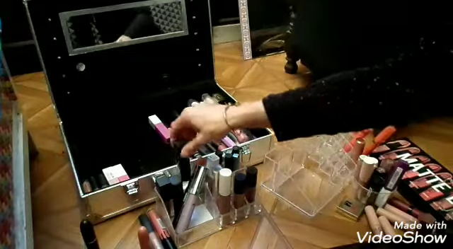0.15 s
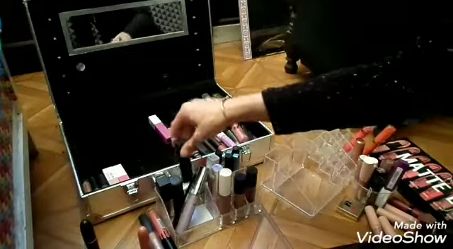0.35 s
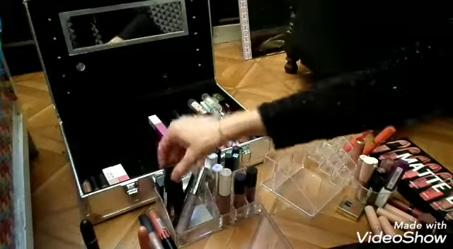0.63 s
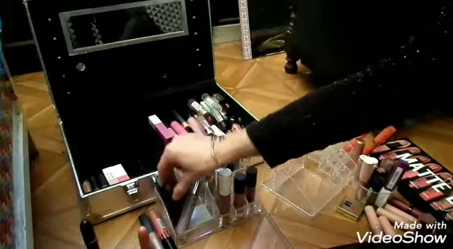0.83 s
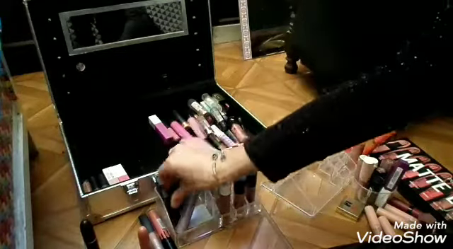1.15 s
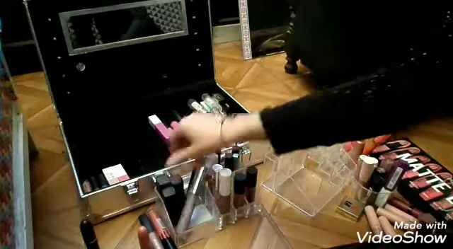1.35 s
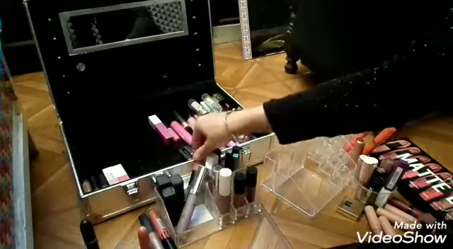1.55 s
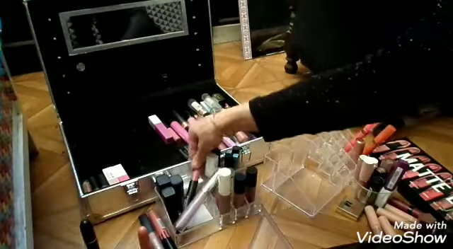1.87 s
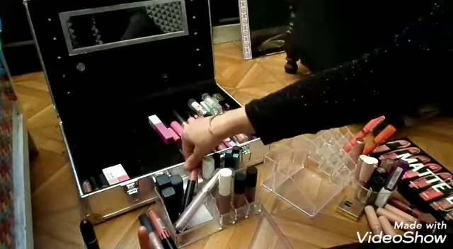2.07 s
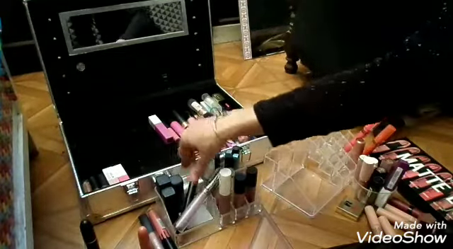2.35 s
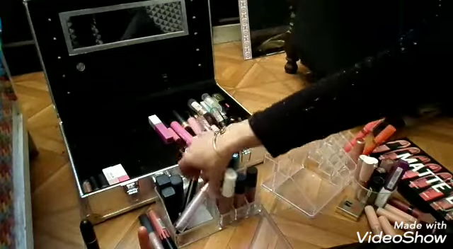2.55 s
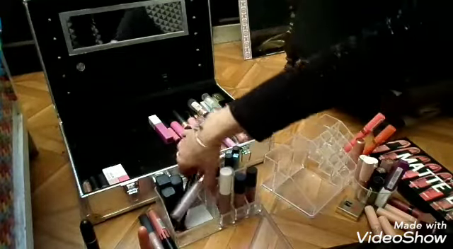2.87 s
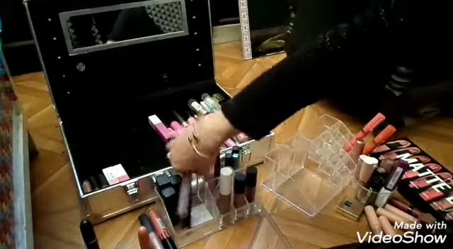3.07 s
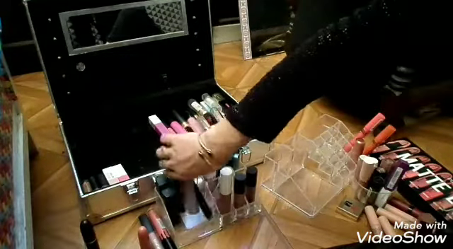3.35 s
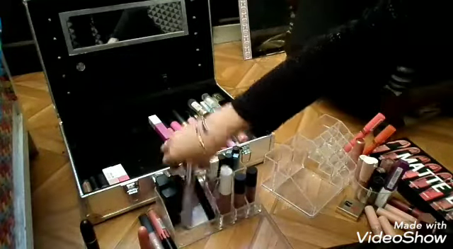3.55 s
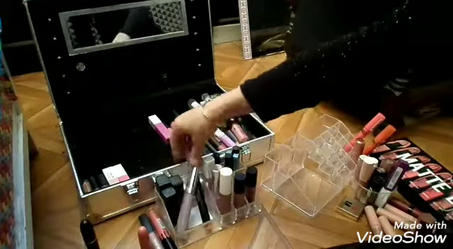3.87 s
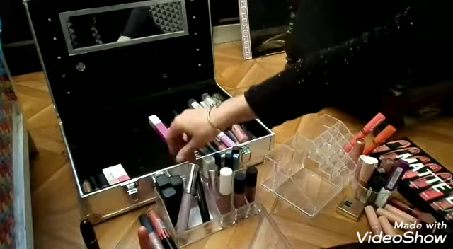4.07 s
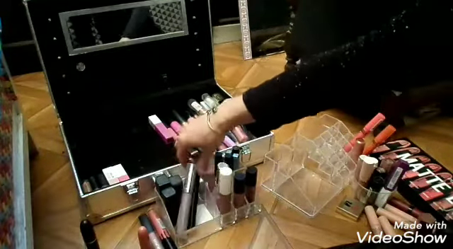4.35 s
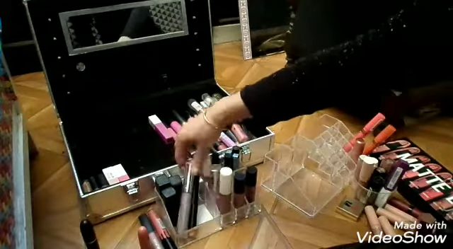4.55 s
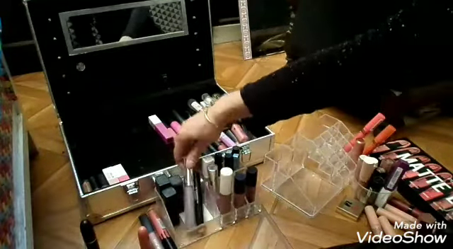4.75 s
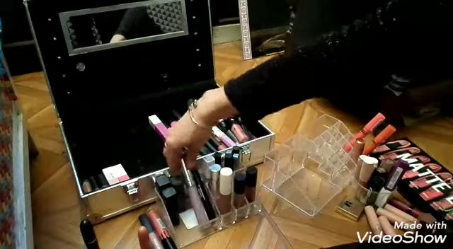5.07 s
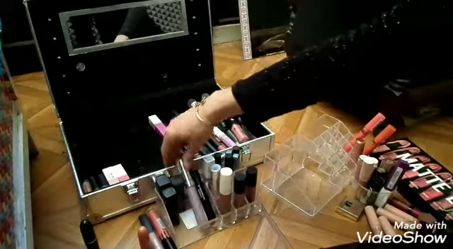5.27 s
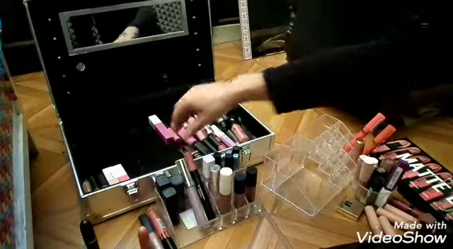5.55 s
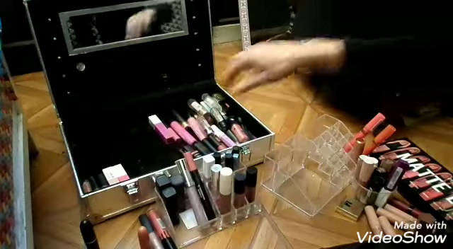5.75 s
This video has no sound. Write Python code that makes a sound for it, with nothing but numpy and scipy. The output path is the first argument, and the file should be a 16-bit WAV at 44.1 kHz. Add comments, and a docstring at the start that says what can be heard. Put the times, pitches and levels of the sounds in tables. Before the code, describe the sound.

Light hard-shelled tubes tap, rattle and briefly rub together in a clear plastic tray, recorded close in a small room. Sparse clacks at first, stronger ones near 0.65, 0.95 and 1.7 seconds, a busier rattle towards three, then a far louder crack with a short floor thump at 3.5. Moderate clicks continue to about 5.3 seconds, then fade into dull wobbling over soft hiss.

```python
"""Sorting lipsticks in an acrylic organiser

A hand sorts lipstick tubes and gloss bottles in an organiser on a wooden floor, close to the microphone.
Each contact is a hollow knock of damped modes with a hard plastic click and tick on top; scrapes are stick-slip noise.
Some knocks repeat quickly, some rock; one tube drops in hard and shakes the floor, and the last one rocks near the end.
The organiser rings, a small room echoes, a low rumble swells late, hiss runs throughout; gain control ducks loud hits."""
import sys
import numpy as np
from scipy import signal
from scipy.fft import rfft, irfft
from scipy.io import wavfile
from scipy.ndimage import uniform_filter1d

SR = 44100
rng = np.random.default_rng(int(sys.argv[2]) if len(sys.argv) > 2 else 0)


def digitize_waveform(pressure):
    """Quantize a signal to 16-bit integers and store it at the path in sys.argv[1].

    Rows of a 2-D input are taken as channels; values are limited to [-1, 1].
    """
    field = np.atleast_2d(pressure).T
    bounded = np.clip(field, -1, 1)
    quanta = np.round(bounded * 32767).astype(np.int16)
    wavfile.write(sys.argv[1], SR, quanta)


N = 260410
T = np.arange(SR // 4) / SR  # time axis of one decay, s

# How readily tubes and organiser radiate. Each row: frequency [Hz], relative level [dB].
RADIATION = [(150, -31), (330, -3.5), (540, -2), (780, 2.5), (1150, -4.5), (1600, 2), (2050, -4.5),
             (2600, -2.5), (3900, 0), (5600, -5), (9500, -10.5), (15500, -12.5)]


def gain_of(db):
    """Decibels to amplitude."""
    return 10 ** (np.asarray(db) / 20)


def read(points, hz):
    """Interpolates a table linearly on a log-frequency axis."""
    f, value = np.transpose(points)
    return np.interp(np.log(hz + 1), np.log(f + 1), value)


def evened(x):
    """Scales to rms 1."""
    return x / np.sqrt(np.mean(x ** 2) + 1e-20)


def one_hit(x):
    """Scales to the energy of 7 ms at rms 1."""
    return x / np.sqrt(np.sum(x ** 2) / (.007 * SR) + 1e-20)


def add(mix, s, sound):
    """Mixes a sound in at time s."""
    part = mix[max(round(s * SR), 0):][:len(sound)]
    part += sound[:len(part)]


def coloured(x, db_at):
    """Filters x by a gain in dB given as a function of frequency."""
    hz = np.fft.rfftfreq(len(x), 1 / SR)
    return irfft(rfft(x) * gain_of(db_at(hz)), len(x))


def hiss(level_db=-59.5):
    """Still air and microphone hiss: steady coloured noise."""
    # Each row: frequency [Hz], relative density [dB].
    hiss_colour = [(20, -1), (110, -5.5), (350, -10), (750, -9.5), (1700, -17.5), (4000, -20.5),
                   (11000, -23.5), (16000, -29)]
    noise = coloured(rng.standard_normal(N), lambda hz: read(hiss_colour, hz))
    return gain_of(level_db) * evened(noise)


def friction(strokes, slips_per_s, smooth_share, slope_db_per_octave):
    """Stick and slip: each stroke is a run of tiny clicks into the plastic over a smooth rub."""
    def rub_db(hz):
        tilt_db = slope_db_per_octave * np.log2(np.maximum(hz / 1000, 1))
        low_cut_db = -20 * np.log10(1 + (350 / (hz + 1)) ** 2)
        return read(RADIATION, hz) + tilt_db + low_cut_db

    slips = rng.uniform(-1.1, 1, N) * ((rng.random(N) < slips_per_s / SR) + smooth_share)
    grain = rng.standard_normal(len(T)) * gain_of(-60 * T / 0.011)  # t60 11 ms
    run = coloured(signal.fftconvolve(slips, grain)[:N], rub_db)
    out = np.zeros(N)
    for start, end, db in strokes:
        length = max(round((end - start) * SR), 64)
        part = run[max(round(start * SR), 0):][:length]
        add(out, start, gain_of(db) * evened(part * signal.windows.tukey(len(part), .5)))
    return out


def scrapes():
    """Tubes scrape along each other in dense slips."""
    # Each row: start [s], end [s], level [dB].
    scrape_strokes = [(0, .04, -37), (.734, .752, -34), (1.787, 1.824, -27.5), (2.428, 2.503, -36),
                      (2.616, 2.695, -39.5), (3.0, 3.055, -43.5), (3.052, 3.082, -27), (3.587, 3.63, -26.5),
                      (4.29, 4.338, -32.5)]
    return friction(scrape_strokes, slips_per_s=1000, smooth_share=0.055, slope_db_per_octave=-5)


def cluster(lo_hz, hi_hz, centre_hz, octaves, t60_s, rise_s, uneven_db, count):
    """Damped plastic modes round a centre; each point of contact wakes them in another mix."""
    t = T[:SR // 25]
    hz = lo_hz * (hi_hz / lo_hz) ** ((np.arange(count) + rng.random(count)) / count)
    off_centre = np.log2(hz / centre_hz) / octaves
    focus_db = -20 * np.log10(1 + off_centre ** 2)
    db = read(RADIATION, hz) + focus_db + uneven_db * rng.standard_normal(count)
    waves = np.sin(2 * np.pi * (hz[:, None] * t + rng.random((count, 1))))
    envelope = gain_of(-60 * t / t60_s) * (1 - np.exp(-t / rise_s))
    return one_hit(gain_of(db) @ waves * envelope)


def knock(pitch_hz, middle_hz=1100, widest_octaves=0.47, narrowing_octaves=0.6, cycles=25):
    """The hollow body of a tube: a middle pitch wakes the widest band of modes, a low or high one a purer tok."""
    octaves = widest_octaves / (1 + (np.log2(pitch_hz / middle_hz) / narrowing_octaves) ** 2)
    return cluster(251.5, 1927, pitch_hz, octaves, t60_s=cycles / pitch_hz, rise_s=0.0033, uneven_db=1.0, count=15)


def hard_shell(click_db, tick_under_db=9, tick_growth=0.22):
    """The click of the hard shell and the tick of its edge; sharp contacts have the strongest tick."""
    click = cluster(1992, 6000, 3200, octaves=5.6, t60_s=0.023, rise_s=0.0011, uneven_db=4.5, count=26)
    tick = cluster(6000, 16000, 6800, octaves=2.7, t60_s=0.029, rise_s=0.0006, uneven_db=5.0, count=44)
    tick_db = click_db - tick_under_db + tick_growth * click_db  # growth: extra dB per dB of click
    return gain_of(click_db - 2.54) * click + gain_of(tick_db) * tick


def contacts_of(hits, lead_db=-20, lead_s=0.0027, chatter_db=-13, chatter_s=0.0056, chatter_loss_db=5, count=3):
    """The hollow knock with its click and tick and a soft click lead-in, then chatter of the light shell."""
    out = np.zeros(N)
    for s, db, pitch_hz, click_db in hits:
        shell = hard_shell(click_db)
        add(out, s, gain_of(db) * (knock(pitch_hz) + shell))
        add(out, s - lead_s, gain_of(db + lead_db) * shell)
        lags_s = np.cumsum(chatter_s * rng.uniform(0.36, 2.4, count))
        for k, lag_s in enumerate(lags_s):
            add(out, s + lag_s, gain_of(db + chatter_db - k * chatter_loss_db) * shell)
    return out


def organiser(x, ring_db=-55, t60_s=0.14):
    """The acrylic walls ring on after every blow: a sum of modes with one common decay."""
    # Each row: ring mode [Hz], relative level [dB].
    wall_modes = [(802, -7), (936, -17.5), (1049, 0), (1379, -1.5), (1658, -1), (1984, 14.5), (2548, 2),
                  (2973, -5.5), (3303, -18.5), (4144, -10), (6330, 3), (7170, -2)]
    ring = sum(gain_of(db) * np.cos(2 * np.pi * hz * T) for hz, db in wall_modes)
    ring = ring * gain_of(-60 * T / t60_s)
    return gain_of(ring_db) * signal.fftconvolve(x, ring)[:N]


def room(x, gap_s=0.0065, build_s=0.0029, count=6, patterns_per_s=10):
    """Echoes from case lid and furniture; patterns crossfade in a cycle as the hand and tubes move about."""
    # Each row: frequency [Hz], t60 [s], level [dB].
    echo_table = np.array([(200, 0.16, -8), (800, .13, -10), (1980, 0.13, -8), (5000, 0.16, -12),
                           (13180, 0.16, -7.5)])
    out = np.zeros(N)
    place = np.arange(N) / SR * patterns_per_s
    for k in range(count):
        echoes = rng.standard_normal(len(T)) * np.clip((T - gap_s) / build_s, 0, 1)
        hz, age_s, z = signal.stft(echoes, SR, nperseg=128)
        z = z * gain_of(-60 * age_s / read(echo_table[:, :2], hz)[:, None])
        levelled = z * gain_of(read(echo_table[:, ::2], hz))[:, None]
        tail = signal.istft(levelled, SR)[1] / np.linalg.norm(signal.istft(z, SR)[1])
        share = np.sqrt(np.maximum(1 - abs((place - k + 1) % count - 1), 0))
        out += signal.oaconvolve(x * share, tail)[:N]
    return out


def rocking(pitch_hz=950, swing_shrink=.924, swing_loss_db=1.5, limp_db=24.5):
    """A tube tips against each side of its slot in turn: quickening, fading dull knocks, uneven if it limps."""
    # Each row: start [s], end [s], first swing before limp [s], level before limp [dB], limp [0-1].
    rocks = [(.158, .58, .111, -39.5, 0), (2.725, 2.97, .111, -40.5, 0), (5.181, 5.87, .097, -48, .07)]
    out = np.zeros(N)
    for s, end, swing_s, db, limp in rocks:
        for k in range(10):
            lean = limp * (-1) ** k  # positive: longer swing, softer landing
            tap = gain_of(db - k * swing_loss_db - lean * limp_db) * knock(pitch_hz)
            add(out, s, tap * (s < end))
            s += swing_s * swing_shrink ** k * (1 + lean)
    return out


def bounces(rebound=.66, dulling_db=5):
    """Quick repeats: each gap is a fixed share of the last, each hit clicks less over its knock."""
    # Knocks with quick repeats, and the later bounces of the hard drop. Each row: first hit [s],
    # knock level [dB], knock pitch [Hz], nominal click over knock [dB], first gap [s],
    # loss per repeat [dB], repeats [count].
    repeated_knocks = [(0.3493, -24.5, 1030, -6, 0.024, 28, 1), (0.4131, -27, 1285, -6, 0.021, 0, 1),
                       (.6494, -15.5, 1214, -4, 0.049, 10.5, 2), (0.762, -25.5, 1080, 2, 0.024, 5, 1),
                       (1.176, -34, 1180, 0.5, 0.026, 4.5, 1), (1.6938, -18.5, 1540, -9, 0.036, 16.5, 1),
                       (1.8208, -17.5, 1030, -10, .0415, 7.5, 3),
                       (2.5247, -37.5, 1200, -6.5, 0.015, 0.5, 1),
                       (2.6398, -29.5, 1030, 2.5, 0.034, -3.5, 1), (3.524, -12, 1275, -1.5, .0367, 5.5, 3),
                       (3.7988, -23, 1460, -11, 0.052, 10.5, 1), (4.0071, -37.5, 1260, 1, .0183, -2.5, 1),
                       (4.3687, -25, 1280, -3, .016, -2.5, 1), (4.4069, -23.5, 1250, 2, 0.036, 10, 1),
                       (4.5956, -23.5, 1290, -8, .046, 12, 1), (4.7832, -22, 1190, -12, 0.024, 9.5, 1),
                       (5.27, -18.5, 1190, -3.5, 0.016, 10, 1)]
    hits = []
    for s, db, pitch_hz, click_db, gap_s, loss_db, count in repeated_knocks:
        for k in range(round(count) + 1):
            hits.append((s, db - k * loss_db, pitch_hz, click_db - k * dulling_db))
            s += gap_s * rebound ** k
    return hits


def jostles():
    """Fingers jostle the tubes lightly: sparse slips."""
    # Each row: start [s], end [s], level [dB].
    jostle_strokes = [(.39, .42, -46.5), (.83, .925, -52.5), (1.545, 1.62, -43.5), (2.5, 2.92, -49.5),
                      (2.99, 3.46, -57), (3.79, 3.87, -42.5), (3.975, 4.03, -49), (4.6, 5.06, -51)]
    return friction(jostle_strokes, slips_per_s=130, smooth_share=0.044, slope_db_per_octave=-3.5)


def thud(drop_s=3.466):
    """The floorboards give a short low push under the dropped tube: decaying sines."""
    # Each row: floor mode [Hz], level [dB], t60 [s].
    floor_modes = [(85, -31.5, 0.054), (300, -24.5, 0.013), (561.6, -19, 0.024)]
    out = np.zeros(N)
    push = sum(gain_of(db - 60 * T / t60_s) * np.sin(2 * np.pi * hz * T) for hz, db, t60_s in floor_modes)
    add(out, drop_s, push)
    return out


def rumble(centre_hz=90, width_hz=35):
    """A swell of noise in the lowest resonance of the boards while the hand leans among the tubes."""
    # One row: start [s], end [s], level at the top of the swell [dB].
    start, end, db = (4.62, 5.04, -59.5)
    low = coloured(rng.standard_normal(N), lambda hz: -20 * np.log10(1 + ((hz - centre_hz) / width_hz) ** 2))
    swell = np.sin(np.pi * np.clip((np.arange(N) / SR - start) / (end - start), 0, 1))
    return gain_of(db) * evened(low) * swell


def scene():
    """All contacts, the ring they leave, the room, the rumble and the hiss."""
    # Knocks of tubes on each other or the organiser, and the first blow of the hard drop at 3.4654 s.
    # Each row: time [s], knock level [dB], knock pitch [Hz], nominal click over knock [dB].
    knocks = [(.0415, -30, 1040, -2), (.9442, -18, 1080, -3), (1.0423, -41, 1500, -15),
              (1.245, -33.5, 970, -18), (1.561, -38, 1350, -2), (1.6321, -35, 1380, -1),
              (1.6396, -34.5, 960, 4.5), (1.7466, -32, 1070, 5.5), (1.7945, -37, 1280, 14.5),
              (1.9945, -30.5, 1110, 0.5), (2.1448, -39.5, 1170, 0.5), (2.2515, -42, 770, -5),
              (2.4225, -26.5, 1280, 5.5), (2.4447, -18.5, 890, -32), (2.5738, -27.5, 1000, -5),
              (2.614, -27, 1120, 1.5), (2.7405, -37, 1120, -1), (2.7826, -37, 1180, 4),
              (2.7932, -23, 920, -5), (2.896, -36.5, 1240, -4.5), (3.0282, -31.5, 850, -12),
              (3.05, -36, 1140, 12), (3.0582, -33.5, 1000, 9.5), (3.139, -26.5, 1260, -2.5),
              (3.206, -30.5, 950, -1), (3.3209, -25, 930, -10.5), (3.3702, -37, 1300, 6.5),
              (3.379, -28, 1100, -3.5), (3.4573, -28.5, 940, -3), (3.4654, -0.5, 1260, -3.5),
              (3.6237, -27, 1010, -6), (3.7551, -23.5, 1490, -3.5), (4.1684, -32, 1300, -16),
              (4.2871, -29.5, 870, 9.5), (4.3079, -35, 960, 14), (4.3135, -24.5, 1010, 0),
              (4.5721, -30, 1170, -2), (4.663, -35, 1140, 1.5), (4.7129, -32, 1400, -4.5),
              (4.857, -35.5, 1010, 0), (4.946, -26, 1120, -8), (4.9584, -18, 1230, -4.5),
              (5.0356, -36, 1130, -4.5), (5.0838, -26, 1246, -2.5)]
    hits = contacts_of(knocks + bounces())
    contacts = hits + scrapes() + jostles() + rocking() + thud()
    return (contacts + organiser(contacts) + room(contacts) + rumble() + hiss())[None]


def record(dry, ceiling=.77, edge_hz=16100):
    """Gain control ducks loud hits and recovers, the microphone rounds off peaks; then a low-pass."""
    # One row: threshold [dB], share of the excess taken off [0-1], recovery [dB per s].
    threshold_db, squeeze, recovery_db_per_s = (-8, 0.56, 12.8)
    power_db = 10 * np.log10(abs(uniform_filter1d(dry[0] ** 2, size=256)) + 1e-12)
    fall_db = np.arange(N) / SR * recovery_db_per_s
    held_db = np.maximum.accumulate(power_db + fall_db) - fall_db  # peak hold with linear release
    over_db = np.maximum(held_db - threshold_db, 0)
    ducked = dry / gain_of(squeeze * uniform_filter1d(over_db, size=600))
    rounded = ducked / (1 + (ducked / ceiling) ** 8) ** (1 / 8)
    low_pass = signal.firwin(511, edge_hz, window=("kaiser", 9), fs=SR)
    return signal.oaconvolve(rounded, low_pass[None], "same")


dry = scene()
out = record(dry)
digitize_waveform(out)
```